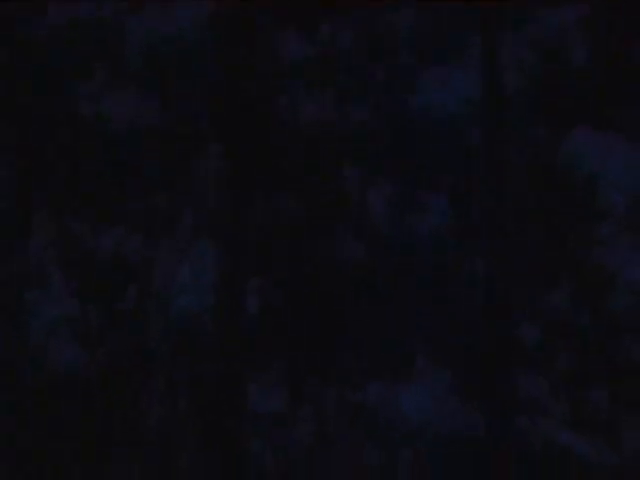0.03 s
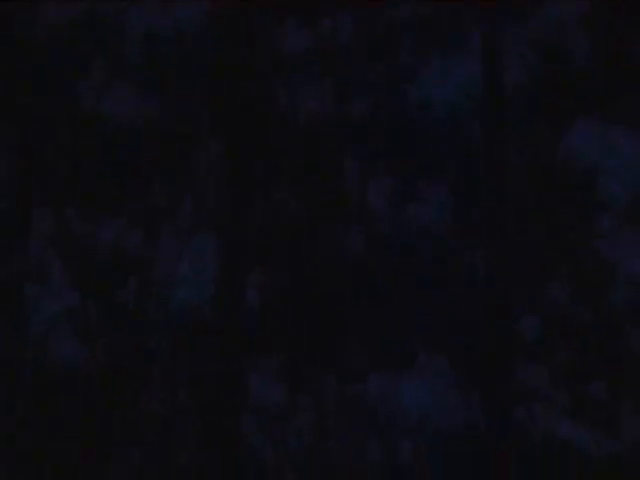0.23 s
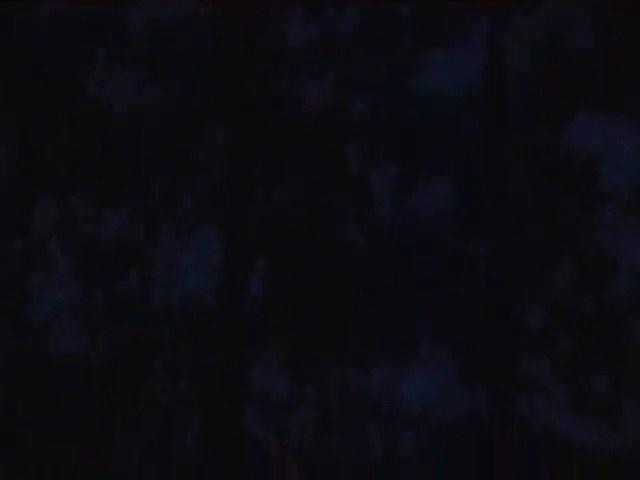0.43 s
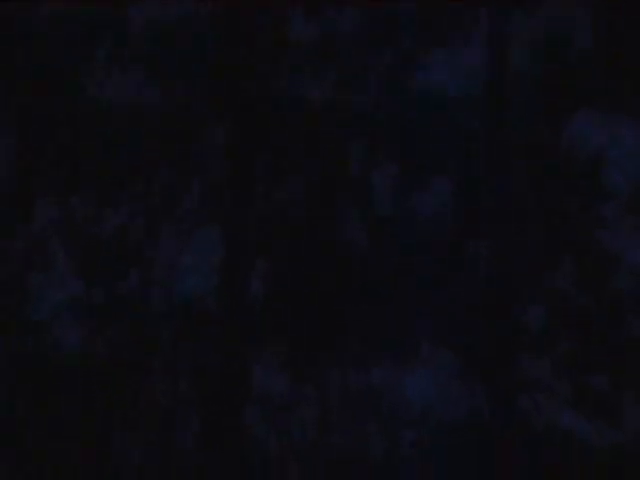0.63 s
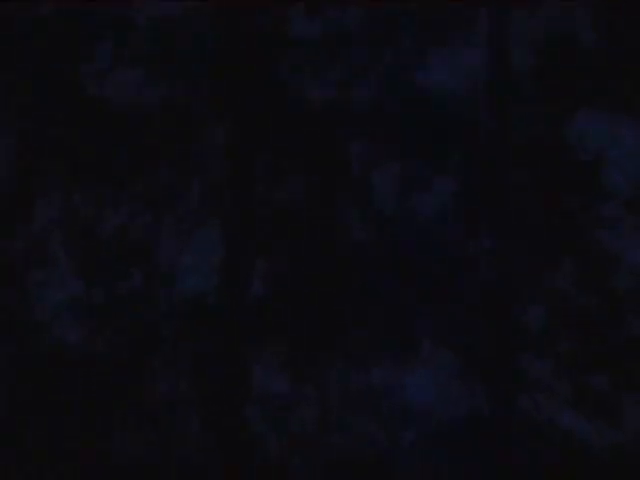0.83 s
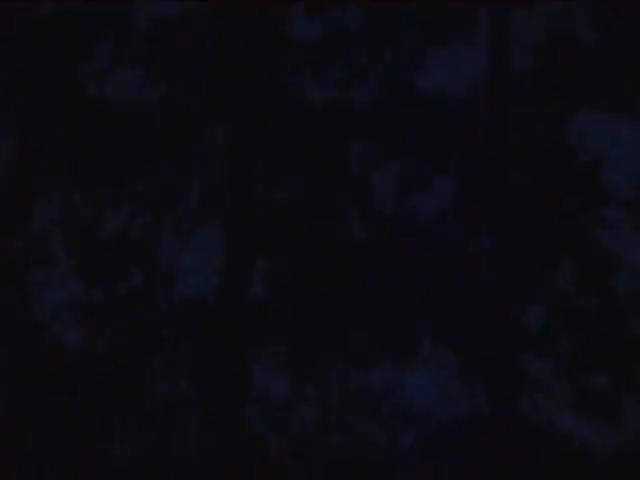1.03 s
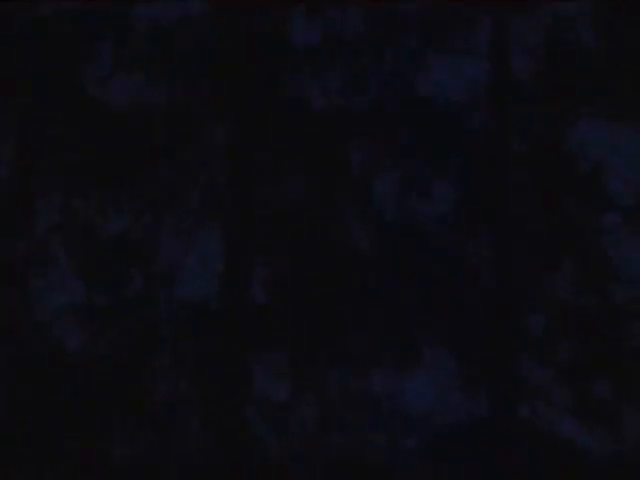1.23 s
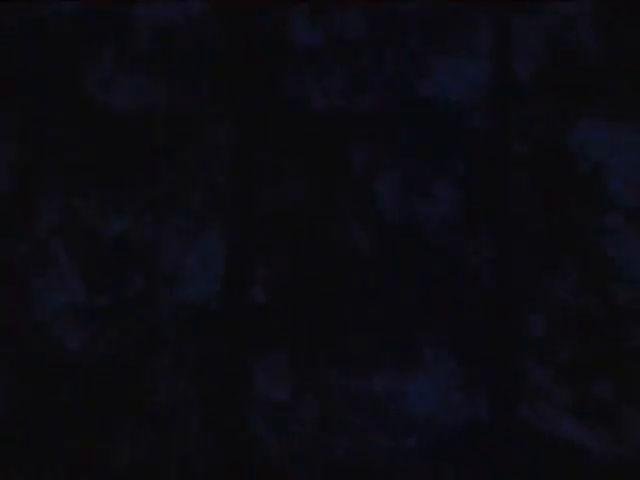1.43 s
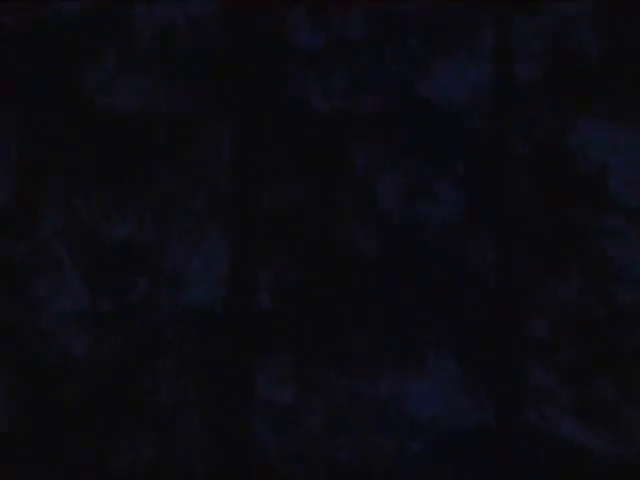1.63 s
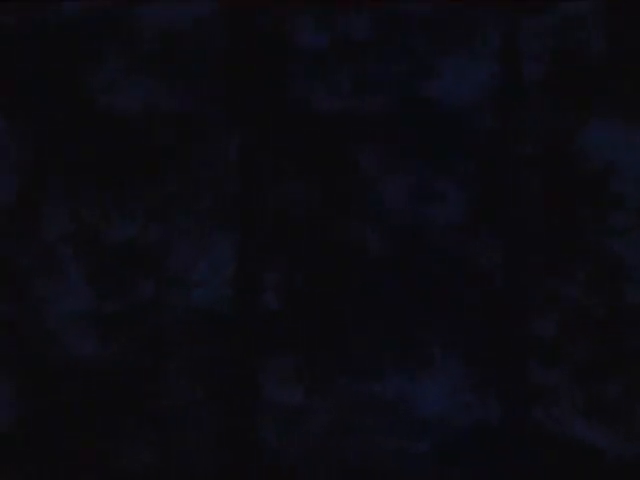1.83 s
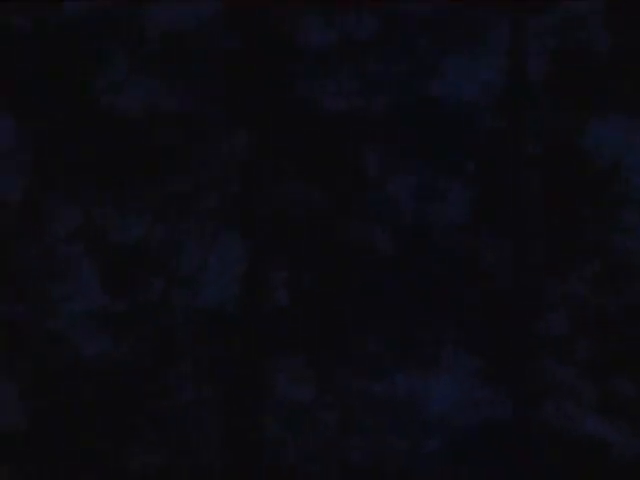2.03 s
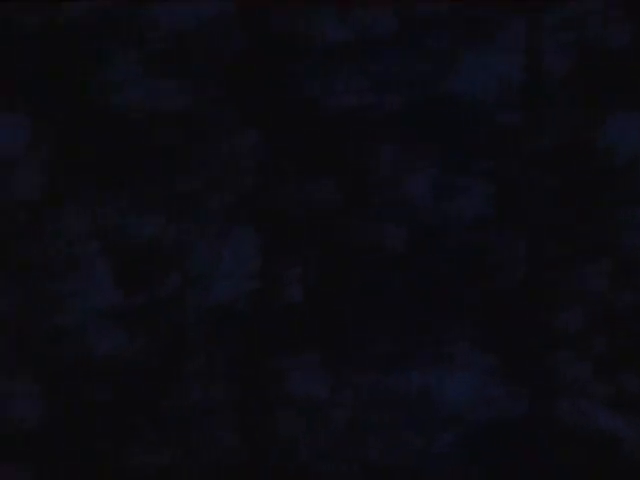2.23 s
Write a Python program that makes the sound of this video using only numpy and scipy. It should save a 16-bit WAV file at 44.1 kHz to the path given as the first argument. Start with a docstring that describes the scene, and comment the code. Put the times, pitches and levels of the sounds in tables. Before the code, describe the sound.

A tawny owl, a little right of centre, gives one sharp ke-wick. From about 0.12 s a thin first note sags then swells; at 0.29 s it breaks upward into a loud, breathy, hoarse arch, ending by 0.4 s. Trunk echoes and a short diffuse tail die within half a second. Faint distant rush, hiss and a slowly swelling low drone continue to 2.3 s, with tiny ticks near 0.1, 0.8, 0.9, 1.6 and 1.7 s.

```python
"""A wood at night: a tawny owl, a little to the right, gives one sharp "ke-wick".
A thin, sagging first note swells and breaks upward into a loud, hoarse arch: one voice of seven harmonics,
with noise rung through throat resonances as its air. Near trunks echo it and the rest scatter it into a tail.
Behind it lie a distant rush and faint hiss of coloured noise, a low drone of two narrow noise bands,
and a few tiny ticks of dying noise."""
import sys
import numpy as np
from scipy import signal
from scipy.fft import rfft, irfft, next_fast_len
from scipy.io import wavfile

SR = 44100
rng = np.random.default_rng(int(sys.argv[2]) if len(sys.argv) > 2 else 0)


def unload_audio(sound):
    """Save the sound as a 16-bit wav file, at the path given as the first command line argument."""
    columns = np.transpose(np.atleast_2d(sound))
    # keep every value between -1 and 1, then stretch to whole-number steps
    steps = np.round(np.clip(columns, -1, 1) * 32767)
    wavfile.write(sys.argv[1], SR, steps.astype(np.int16))


N = 101430
T = np.arange(N) / SR  # time of each sample, s


def from_db(db):
    """Decibels to gain."""
    return 10 ** (np.asarray(db) / 20)


def rms_one(x):
    """Scale to rms 1."""
    return x / np.sqrt(np.mean(x ** 2) + 1e-20)


def in_time(rows):
    """The columns of a curve, read at every sample."""
    s, *columns = np.transpose(rows)
    return [np.interp(T, s, column) for column in columns]


def at_hz(points, hz):
    """Read a table of (hz, value) on a log-frequency axis."""
    table_hz, values = np.transpose(points)
    return np.interp(np.log(hz + 1e-6), np.log(table_hz), values)


def shaped(x, gain):
    """Filter by a gain given as a function of Hz."""
    size = next_fast_len(N + SR // 2)
    hz = np.arange(size // 2 + 1) * SR / size
    return irfft(rfft(x, size) * gain(hz), size)[..., :N]


def noise(colour):
    """Noise of a given colour, rms 1."""
    return rms_one(shaped(rng.standard_normal(N), lambda hz: from_db(at_hz(colour, hz))))


def waver(rate_hz):
    """Smooth random wandering of rms 1, weaker above rate_hz."""
    return rms_one(shaped(rng.standard_normal(N), lambda hz: 1 / (1 + (hz / rate_hz) ** 2)))


def pan(db):
    """Left and right gains for a level difference, left minus right."""
    return from_db(np.array([[.5], [-.5]]) * db)


def stereo_noise(likeness):
    """Two white noises, left and right, alike as far as likeness(Hz) says."""
    mid, side = rng.standard_normal((2, N))

    def share(hz):
        return (1 + np.clip(likeness(hz), -1, 1)) / 2

    mid = shaped(mid, lambda hz: np.sqrt(share(hz)))
    side = shaped(side, lambda hz: np.sqrt(1 - share(hz)))
    return mid + side * [[1], [-1]]


def owl():
    """One unbroken voice that jumps in pitch between the notes, with air rushing through it."""
    # path of each note: start_s, pitch_hz, second_harmonic_db, upper_harmonics_db
    ke = [(0.118, 1151, -47.5, -52), (0.134, 1238, -42.5, -45), (0.16, 1152, -48.5, -53.5),
          (0.188, 1094, -50, -48), (0.202, 1075, -52, -60), (0.216, 1072, -46, -54),
          (0.244, 1109, -46.5, -46), (0.268, 1212, -39, -44), (0.28, 1201, -36, -46.5),
          (0.29, 1262, -34.5, -36.5)]
    wick = [(0.294, 1530, -30.5, -40), (0.3, 1553, -25.5, -37), (0.31, 1608, -33, -44.5),
            (0.326, 1619, -38.5, -37.5), (0.336, 1621, -30, -41), (0.344, 1641, -39, -41),
            (0.364, 1593, -25.5, -43.5), (0.376, 1554, -25.5, -38), (0.39, 1405, -33.5, -53)]
    # level of the fundamental: start_s, level_db
    fundamental = [(.12, -64), (.136, -51.5), (.21, -54), (.288, -46), (.302, -41), (.315, -56),
                   (.331, -39.5), (.348, -53), (.362, -52), (.372, -35.5), (.39, -58.5)]
    # harmonics 1, 2, 3 .., each against its level curve: first_note_db, second_note_db
    harmonics = [(-2, -1), (-0.5, -3.5), (-2, -1), (-7, -13.5), (-11.5, -24), (-16, -38), (-22, -36)]
    # rush of air in the throat: start_s, level_db
    air_level = [(.12, -64), (.135, -59), (.2, -61.5), (.245, -65), (.272, -47), (.284, -56), (.294, -44),
                 (.318, -49), (.35, -50.5), (.372, -45), (.392, -51.5)]
    attack_s, release_s = 0.0047, 0.01
    flick, flick_s = .13, 0.00291  # the voice catches sharp by this share of the pitch and settles
    bloom_s = .008  # the upper harmonics come in a little later
    jitter, jitter_hz = 0.0038, 263  # pitch unsteadiness, as a share of the pitch, and its rate
    rasp_ke, rasp_wick = 0.086, 0.018  # cycle-to-cycle unevenness of strength, as a share
    air_pulsing = 0.58  # depth of the air's pulsing with each cycle
    ke_air_cut_hz = 6000  # the air is duller in the first note

    pitch, second_db, upper_db = in_time(list(ke) + list(wick))
    start_s, end_s = ke[0][0], wick[-1][0]
    broken = np.interp(T, [ke[-1][0], wick[0][0]], [0, 1])  # 0 in the first note, 1 in the second
    attack = np.clip((T - start_s) / attack_s + 1, 0, 1)
    release = np.clip((end_s - T) / release_s + 1, 0, 1)

    age = np.maximum(T - start_s, 0)
    pitch = pitch * (1 + flick * np.exp(-age / flick_s))
    upper_db = upper_db - 10 * np.exp(-age / bloom_s)
    phase = 2 * np.pi * np.cumsum(pitch * (1 + jitter * waver(jitter_hz))) / SR

    curves = {1: in_time(fundamental)[0], 2: second_db}
    voice = 0
    for k, (ke_db, wick_db) in enumerate(harmonics, 1):
        level_db = curves.get(k, upper_db) + ke_db + broken * (wick_db - ke_db)
        voice = voice + from_db(level_db) * np.sqrt(2) * np.sin(k * phase)
    rasp = (rasp_ke + broken * (rasp_wick - rasp_ke)) * waver(pitch.mean())

    puffs = rng.standard_normal(N) * (1 + air_pulsing * np.sin(phase))
    air = rms_one(throat(puffs))
    dull_air = shaped(air, lambda hz: 1 / np.sqrt(1 + (hz / ke_air_cut_hz) ** 2))
    air = broken * air + (1 - broken) * dull_air
    return attack * release * (voice * (1 + rasp) + from_db(in_time(air_level)[0]) * air)


def throat(x):
    """The fixed resonances that the air excites in throat and beak, their powers added."""
    # resonances: centre_hz, width_hz, level_db
    resonances = [(770, 210, -3.5), (1250, 690, -13), (2670, 120, 6.5), (2960, 300, -8), (4020, 140, -5),
                  (4550, 250, 1), (5670, 280, -7), (6200, 180, -7), (7020, 200, -0.5), (8600, 150, -3.5),
                  (9980, 350, -11.5), (10950, 250, -6.5), (12450, 310, -8), (14550, 260, -7)]

    def power(hz):
        return sum(from_db(2 * db) / (1 + ((hz - centre) / width) ** 2) ** 2
                   for centre, width, db in resonances)

    return shaped(x, lambda hz: np.sqrt(power(hz)))


def wood(call):
    """The direct call, a few echoes from near trunks and a dying scatter from the rest."""
    # near trunks, before the wood's colour: delay_s, level_db
    echoes = [(0.032, -17), (0.073, -27), (0.162, -32.5)]
    # colour of all that the wood returns: pitch_hz, gain_db
    wood_colour = [(500, 8), (1450, -0.5), (1620, 6), (2000, 3), (2450, -6.5), (3000, -5.5), (3260, 5),
                   (3500, 5.5), (4800, -2), (8000, 6), (15000, -1)]
    scatter_db, delay_s, likeness = -10.5, 0.011, 0.7  # likeness of left and right
    low_t60_s, high_t60_s, split_hz = 0.65, 0.34, 2870  # the lows linger

    near = sum(from_db(db) * np.interp(T - s, T, call, left=0) for s, db in echoes)
    white = stereo_noise(lambda hz: likeness)
    low = shaped(white, lambda hz: 1 / (1 + (hz / split_hz) ** 8))
    high = white - low
    scatter = low * from_db(-60 * T / low_t60_s) + high * from_db(-60 * T / high_t60_s)
    scatter = scatter * (T > delay_s)
    scatter = scatter / np.sqrt(np.sum(scatter ** 2) / 2)  # unit energy per channel
    far = from_db(scatter_db) * signal.fftconvolve(scatter, call[None], axes=1)[:, :N]
    return call + shaped(near + far, lambda hz: from_db(at_hz(wood_colour, hz)))


def ticks():
    """Tiny ticks, perhaps twigs or drips: each is a brief, dying crackle of coloured noise."""
    # ticks: start_s, level_db
    tick_list = [(.076, -54), (.775, -55), (.925, -50.5), (1.574, -57), (1.691, -52.5)]
    # colour of the crackle: pitch_hz, relative level_db per Hz
    tick_colour = [(600, -12), (2000, 11), (4500, 2), (7000, -4), (14000, -24)]
    t60_s = 0.033
    level = sum(from_db(db - 60 * np.abs(T - s) / t60_s) * (T >= s) for s, db in tick_list)
    return level * noise(tick_colour)


def night():
    """Steady distant rush and hiss: noise coloured, widened and panned by frequency."""
    # colour of the night: pitch_hz, relative level_db per Hz
    night_colour = [(22, -41), (33, -37), (48, -5.5), (75, -16.5), (110, -6.5), (160, -8), (300, -9.5),
                    (500, -8.5), (680, -8.5), (900, -5.5), (1150, -10.5), (1650, -18), (2700, -19),
                    (3400, -24.5), (7000, -29), (15400, -33.5)]
    # likeness of left and right: pitch_hz, likeness (1 is identical)
    night_likeness = [(40, 1), (100, 0.79), (250, 0.79), (600, 0.52), (1000, 0.5), (3000, 0.2),
                      (14000, 0.4)]
    # balance: pitch_hz, left_minus_right_db
    night_pan = [(60, -5), (240, -2.5), (950, -2), (3770, 0), (15000, 0.0)]
    level_db = -51.5
    white = stereo_noise(lambda hz: at_hz(night_likeness, hz))
    rush = shaped(white, lambda hz: from_db(at_hz(night_colour, hz)) * pan(at_hz(night_pan, hz)))
    return from_db(level_db) * rms_one(rush)


def drone():
    """A low, unsteady drone, like far traffic: narrow bands of noise that swell together."""
    # bands, before the swell: centre_hz, width_hz, level_db
    bands = [(99.1, 10.3, -62.5), (194, 5.6, -68.5)]
    # slow swell: start_s, gain_db
    swell = [(0, -0.5), (.8, 0.5), (1.3, 3.5), (1.65, 2.5), (1.95, 4), (2.3, 1)]

    def band(centre, width):
        white = rng.standard_normal(N)
        return rms_one(shaped(white, lambda hz: 1 / (1 + ((hz - centre) / width) ** 2)))

    lines = sum(from_db(db) * band(centre, width) for centre, width, db in bands)
    return lines * from_db(in_time(swell)[0]) * pan(-2.5)


def scene():
    """The owl in its wood, a little to the right, over the night background."""
    # balance of the owl: pitch_hz, left_minus_right_db
    owl_pan = [(1500, -2.4), (2400, -2.5), (3200, -3.5), (4800, -5.5), (7000, -4), (14000, -3)]
    call = shaped(wood(owl()), lambda hz: pan(at_hz(owl_pan, hz)))
    return call + night() + drone() + ticks()


def record(dry):
    """A steep elliptic low-pass cuts the top."""
    cutoff_hz = 15550
    low_pass = signal.ellip(12, .1, 70, cutoff_hz, fs=SR, output="sos")  # order, ripple dB, stop dB
    return signal.sosfilt(low_pass, dry)


dry = scene()
out = record(dry)
unload_audio(out)
```